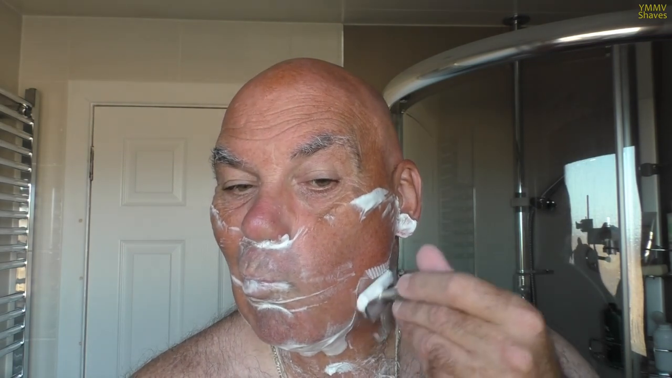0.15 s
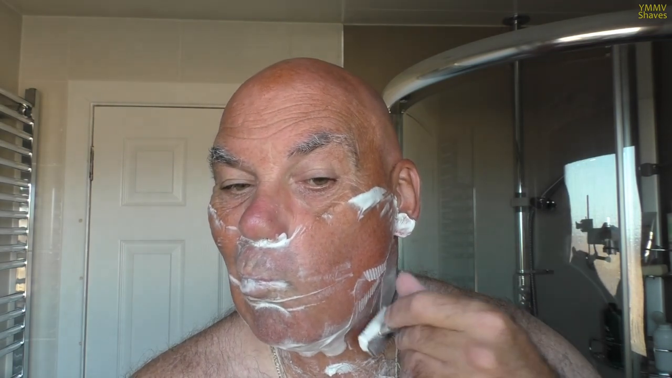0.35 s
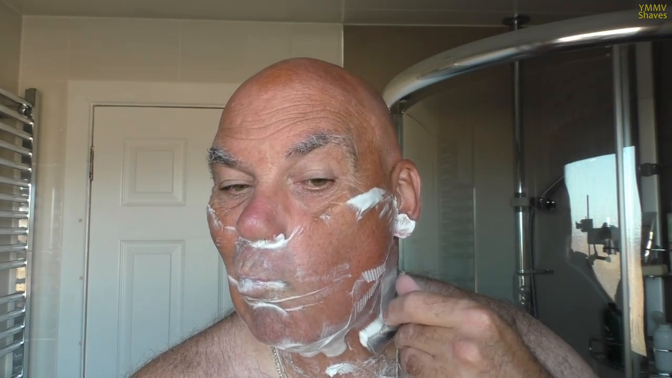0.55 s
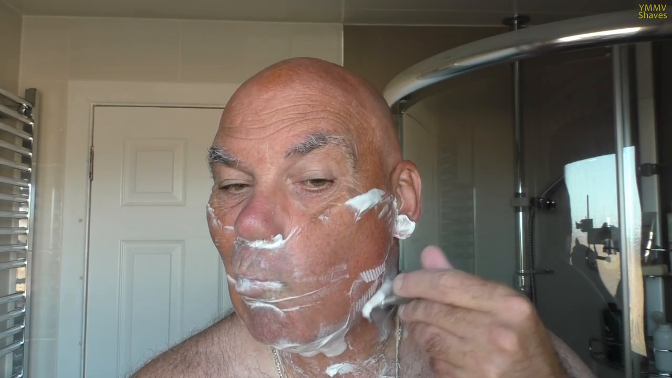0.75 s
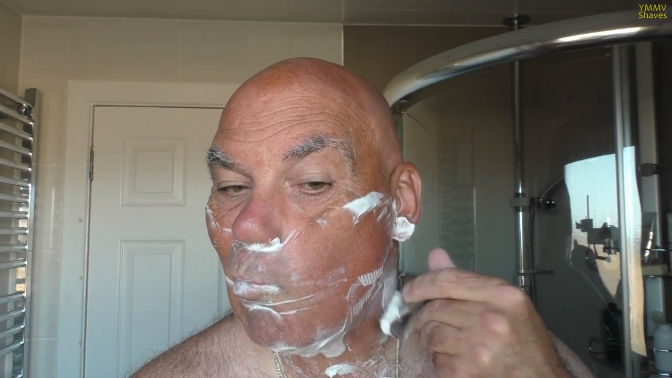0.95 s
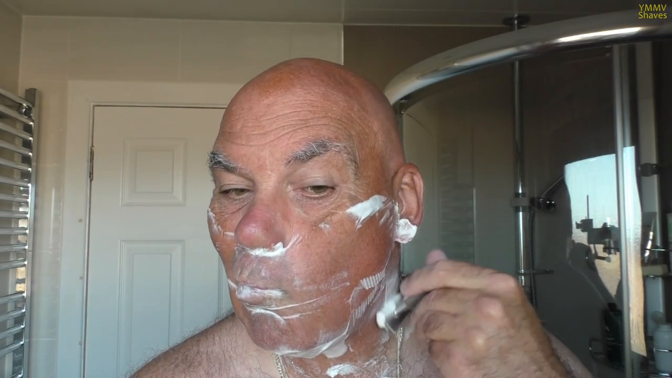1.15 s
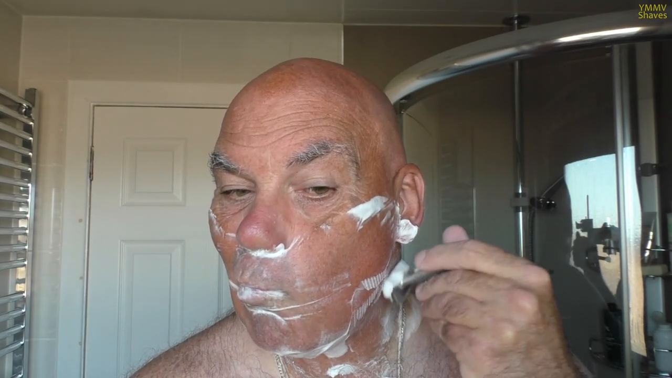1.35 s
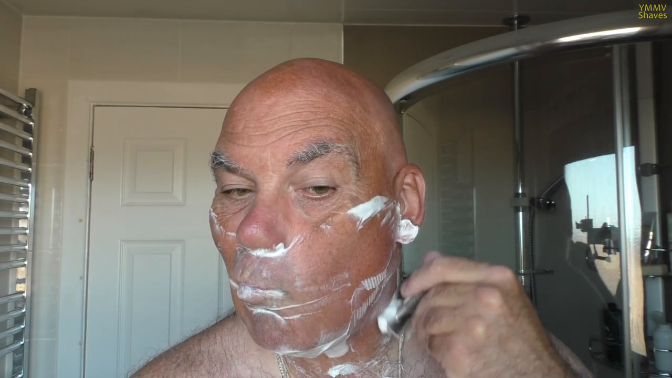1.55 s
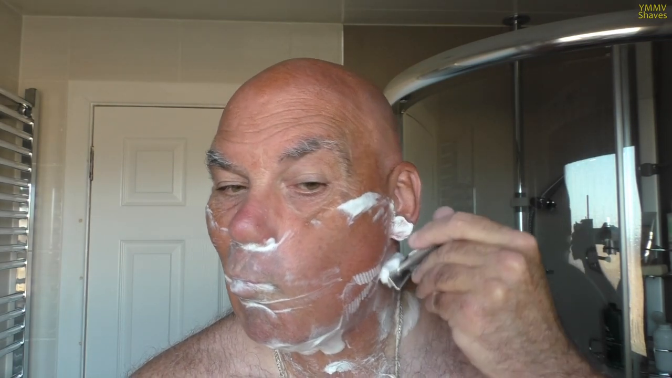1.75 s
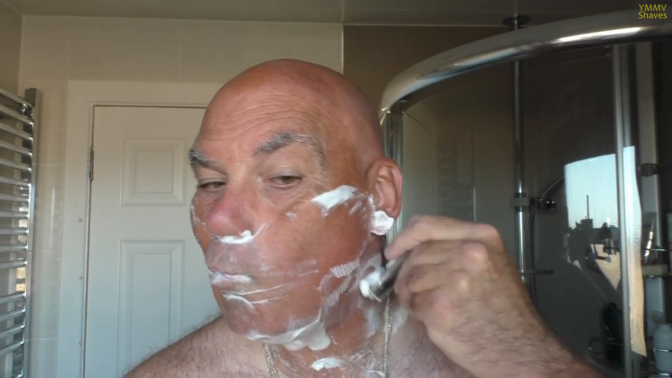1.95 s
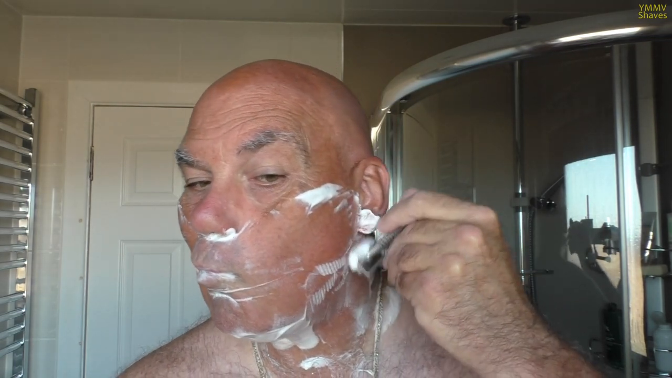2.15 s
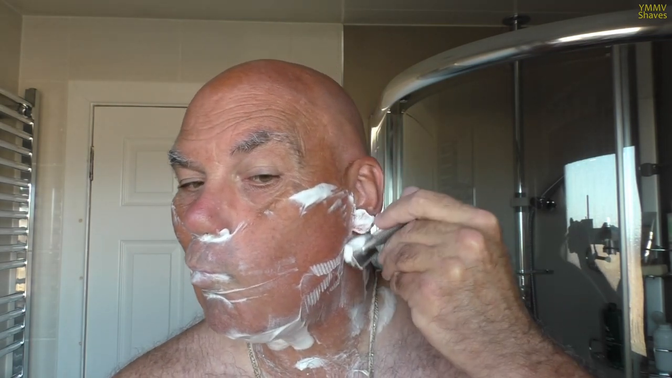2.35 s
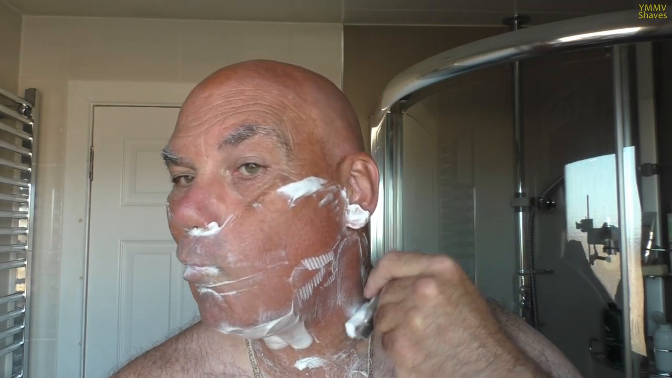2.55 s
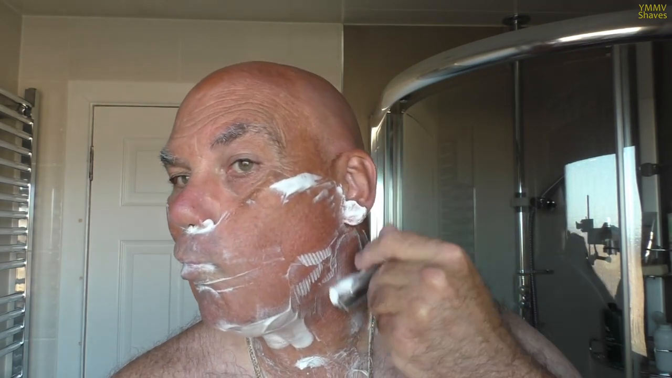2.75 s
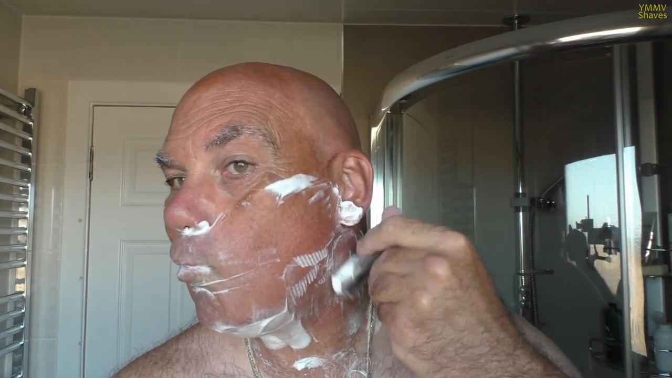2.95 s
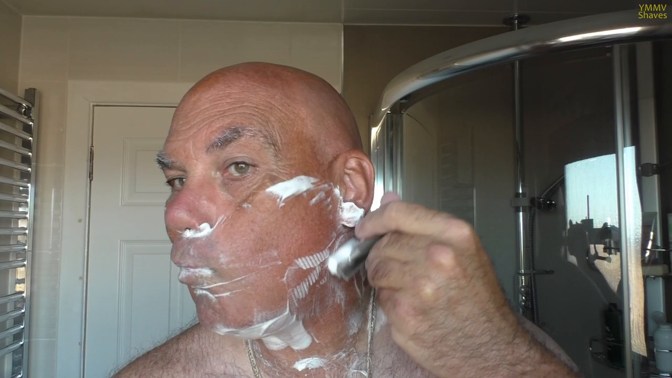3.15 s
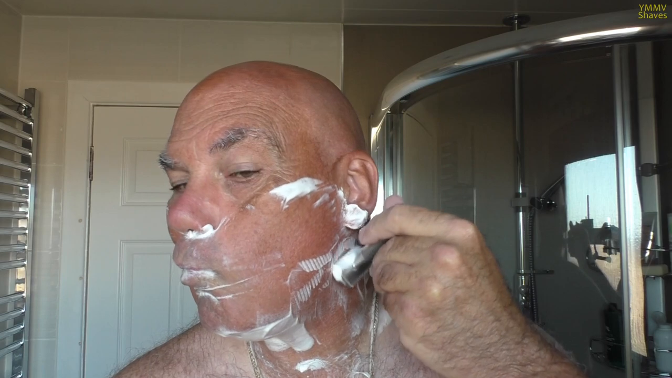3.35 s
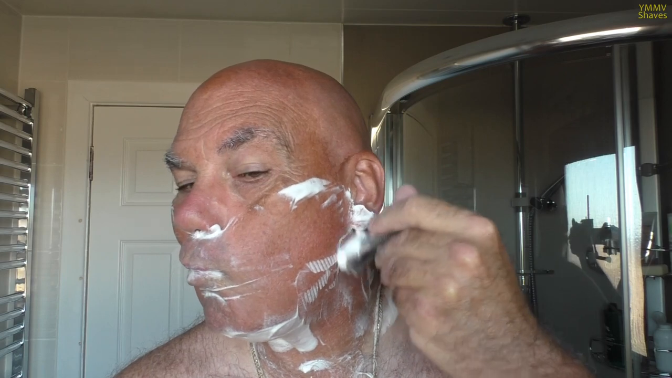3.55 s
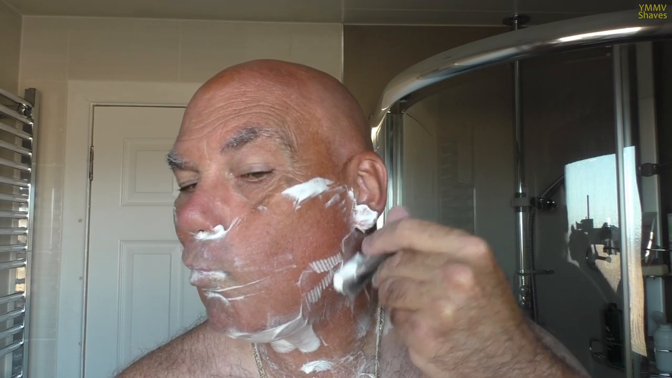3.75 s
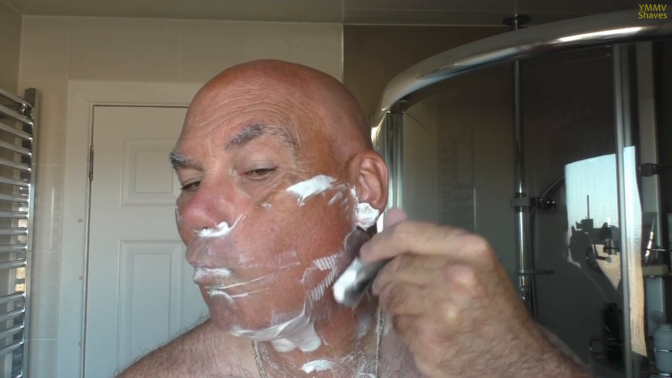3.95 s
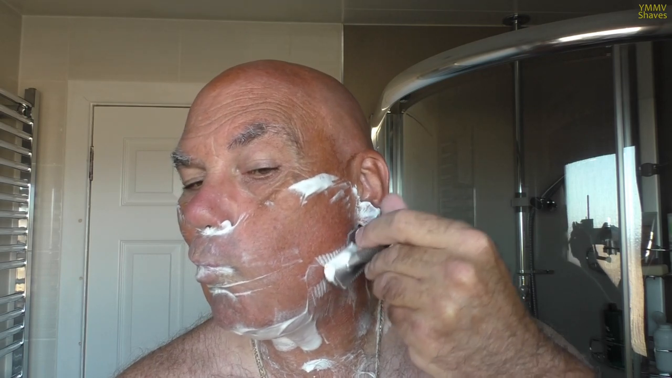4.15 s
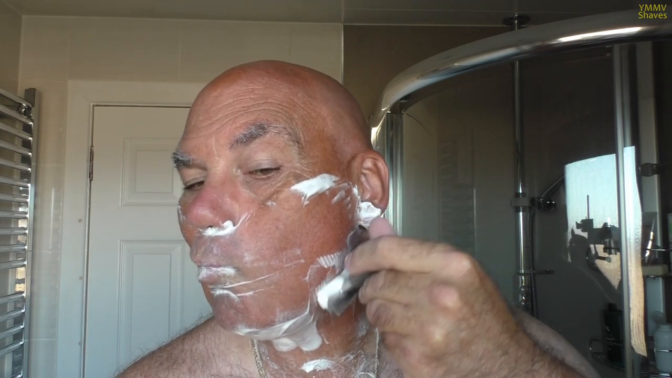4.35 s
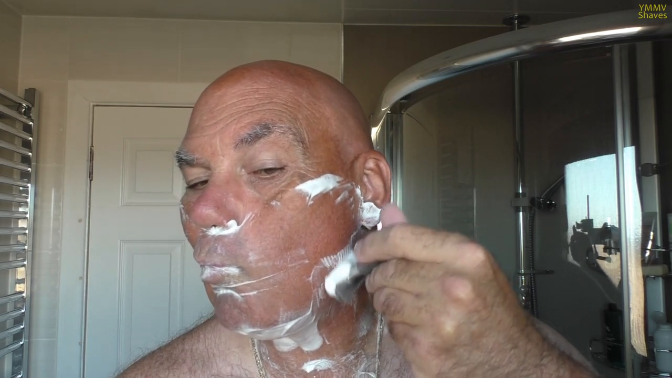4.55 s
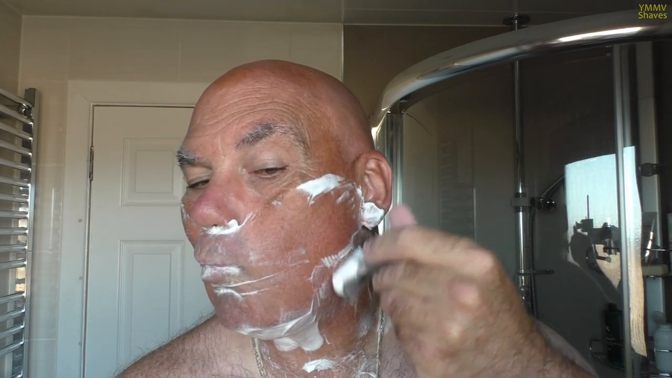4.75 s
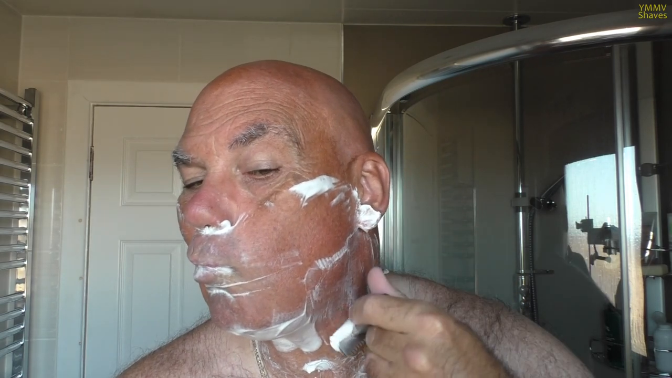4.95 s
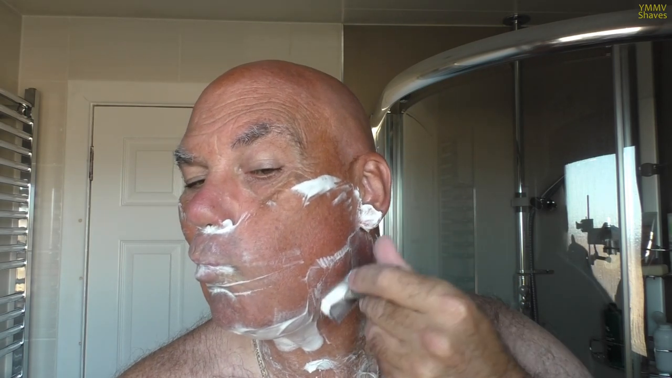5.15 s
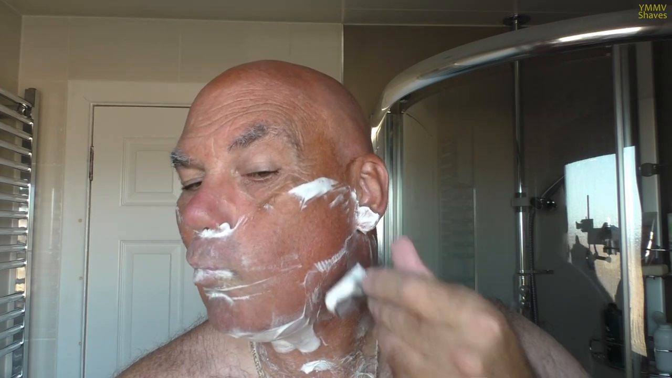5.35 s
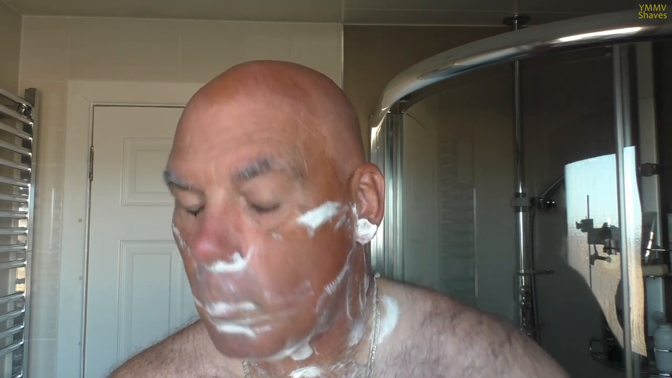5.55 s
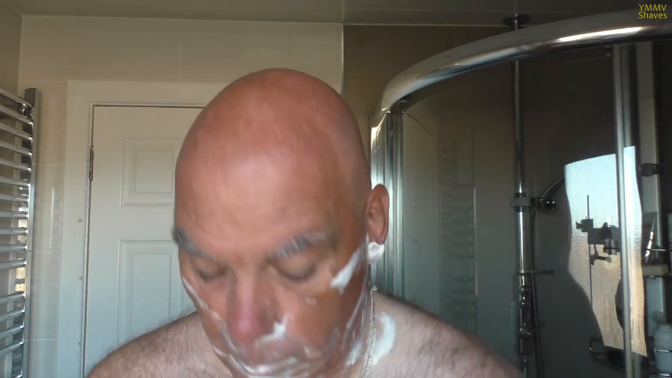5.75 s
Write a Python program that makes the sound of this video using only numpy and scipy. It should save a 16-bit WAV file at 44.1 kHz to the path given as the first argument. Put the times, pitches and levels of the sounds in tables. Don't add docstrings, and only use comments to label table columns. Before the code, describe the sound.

In a quiet tiled bathroom, a small nearby microphone picks up a razor making short, irregular, crackly scrapes through lather and stubble, with small ticks as the blade lands. A soft low fan rumble runs steadily beneath. After about five seconds of strokes there is a brief gap, then the razor scrapes and knocks on the ceramic basin, with a hollow low boom.

```python
import sys
import numpy as np
from scipy import signal
from scipy.fft import rfft, irfft
from scipy.io import wavfile
from scipy.ndimage import uniform_filter1d

SR = 44100
rng = np.random.default_rng(int(sys.argv[2]) if len(sys.argv) > 2 else 0)


def natural_amplitude(level_db):
    exponent = np.asarray(level_db, float) / 20
    return 10 ** exponent


def dump_mix(stems):
    frames = np.atleast_2d(stems).T
    limited = np.clip(frames, -1, 1)
    pcm = np.round(limited * 32767).astype(np.int16)
    wavfile.write(sys.argv[1], SR, pcm)


N = 256220


def evened(x):
    return x / np.sqrt(np.mean(x ** 2) + 1e-20)


def read(points, hz):
    f, value = np.transpose(points)
    return np.interp(np.log(hz + 1), np.log(f + 1), value)


def add(mix, s, sound):
    part = mix[round(s * SR):][:len(sound)]
    part += sound[:len(part)]


def colour(x, spectrum):
    gain = natural_amplitude(read(spectrum, np.fft.rfftfreq(len(x), 1 / SR)))
    return evened(irfft(rfft(x) * gain, len(x)))


def resonate(x, hz, width):
    turn = np.exp(2j * np.pi * np.cumsum(hz * np.ones(len(x))) / SR)
    r = np.exp(-np.pi * width / SR)
    smooth = signal.lfilter([1 - r], [1, -r], x / turn + 1e-18)
    return 2 * (turn * smooth).real


def ring(x, modes, skirt=3.9):
    out = 0
    for k, (hz, width, db) in enumerate(modes):
        mode = resonate(resonate(x, hz, width), hz, skirt * width + 60)
        out = out + (-1) ** k * natural_amplitude(db) * mode
    return out


def clicks(count, per_s, spread_db):
    chance, sign = rng.random((2, count))
    size = natural_amplitude(spread_db * np.minimum(rng.exponential(1, count), 5))
    return evened(size * np.sign(sign - .5) * (chance < per_s / SR))


def patchy(shape, bins, frames):
    over_hz = uniform_filter1d(rng.standard_normal(shape), bins, 0)
    return evened(uniform_filter1d(over_hz, frames, 1))


def air(spectrum, size, patch_db, flicker_db):
    noise = rng.standard_normal(N + size)
    hz, t, z = signal.stft(noise, SR, nperseg=size, noverlap=size * 3 // 4)
    field = patch_db * patchy(z.shape, 6, 8) + flicker_db * patchy((1, len(t)), 1, 3)
    level_db = np.where(hz < spectrum[0][0], -99, read(spectrum, hz))
    shaped = z * natural_amplitude(level_db[:, None] + field)
    return evened(signal.istft(shaped, SR, nperseg=size, noverlap=size * 3 // 4)[1][:N])


# [Hz, dB per Hz]
RUMBLE = [(12, -55), (20, -24.5), (188, 0.5), (233, 1.5), (298, -1), (397, -5), (465, -12), (577, -31.5),
          (620, -106), (810, -60), (1360, -120)]
# [Hz, dB per Hz]
HISS = [(340, -26), (580, -5.5), (1010, -3.5), (1090, -6.5), (1190, -4), (1820, -5), (2180, -7), (2440, -2),
        (2650, -16.5), (3040, -8), (3950, -12), (7150, -12), (9550, -6.5), (15700, -13.5)]
# [Hz, Hz, dB]
WHINE = [(2700, 83, -87.5)]
RUMBLE_DB, HISS_DB = -52, -66


def background():
    rumble = natural_amplitude(RUMBLE_DB) * air(RUMBLE, size=2048, patch_db=0.0, flicker_db=1.37)
    whine = 24.0 * ring(rng.standard_normal(N), WHINE)
    hiss = natural_amplitude(HISS_DB) * air(HISS, size=512, patch_db=2.5, flicker_db=0.65)
    return rumble + whine + hiss


# [s, s, s, dB, dB]
STROKES = [(.05, .035, 0.071, -47.5, -16), (.262, .012, .02, -68, -14), (.555, 0.086, 0.25, -53, -19),
           (.893, .01, .03, -66, -18), (1.14, 0.13, .145, -53.5, -11), (1.576, .08, .15, -53, -6),
           (1.834, .008, 0.013, -65.5, -14), (1.975, 0.033, 0.12, -49, -21.5),
           (2.265, 0.05, 0.07, -53, -11), (2.62, 0.022, 0.094, -65.5, -4.5), (2.7, 0.075, .14, -56, -8.5),
           (2.9, .02, 0.064, -70.5, -11), (3.069, 0.061, 0.12, -52, -11),
           (3.386, 0.063, 0.071, -48.5, -13.5), (3.716, 0.036, 0.1, -50, -17.5),
           (4.04, 0.024, 0.14, -57.5, -6.5), (4.23, 0.018, .04, -66, -9), (4.345, 0.016, 0.048, -59, -11),
           (4.389, 0.058, 0.081, -53, -8), (4.61, .065, 0.087, -61, -9.5), (4.938, 0.0045, .02, -71, -16),
           (4.997, .01, .03, -61.5, -18), (5.04, 0.057, 0.076, -48.5, -15),
           (5.09, 0.034, .125, -51.5, -9.5)]
GUARD_DB = (-6.5, -5.5, -8, -5.5, -8.5)
CHEEK_DB = (1, 1.5, -1.5, 0.5, 6)
# head resonance f/Hz, sagging under pressure [Hz]
HEAD_HZ = (4500, 4300, 4000, 4080, 4760)
LAND_S, LAND_DB, BITE_DB = 0.012, -17, -2.5
SLIP_S, SLIP_DB, FADE_DB_PER_S = 0.041, -11.5, 130
GUARD_FOLLOW = 0.45


def strokes(t):
    rows = []
    for land, bite, lift, db, cheek_db in STROKES:
        u = t - land
        at = np.cumsum([0, abs(bite), abs(lift - bite), SLIP_S, .15])
        level_db = np.interp(u, at[:4], [LAND_DB, BITE_DB, 0, SLIP_DB]) + db
        level_db = level_db - FADE_DB_PER_S * np.maximum(u - at[3], 0)
        level_db = level_db - 25 * np.maximum(-u, 0) / LAND_S
        guard_db = GUARD_FOLLOW * (cheek_db + 12) + np.interp(u, at, GUARD_DB)
        drum_db = cheek_db + np.interp(u, at, CHEEK_DB)
        rows.append([level_db, guard_db, drum_db, np.interp(u, at, HEAD_HZ)])
    rows = np.array(rows)
    loudest = rows[:, :1].argmax(axis=0)[None]
    return np.take_along_axis(rows, loudest, axis=0)[0]


# [s, dB, s, s]
FIZZES = [(.09, -49, -0.5, 0.06), (.285, -65.5, .02, 0.2), (.70, -52, .07, 0.07), (1.245, -56.5, .075, 0.1),
          (1.375, -67, 0.15, -0.1), (1.66, -55, 0.07, .08), (1.86, -58.5, .02, 0.08),
          (1.995, -55.5, .04, 0.1), (2.085, -50.5, 0.02, 0.05), (2.19, -65, 0, .04),
          (2.325, -57.5, .04, 0.08), (2.785, -51, 0.07, 0.08), (3.09, -55, 0, .05), (3.19, -59.5, .06, .04),
          (3.46, -54.5, 0.07, .055), (3.74, -50, .035, .075), (3.82, -54.5, 0, .03), (4.1, -55, 0.05, .05),
          (4.265, -66.5, .04, 0.1), (4.36, -60, 0.03, .04), (4.46, -59, 0.06, .06), (4.685, -62, 0.03, 0),
          (5.005, -59, .01, .06), (5.105, -48, .055, 0.12), (5.245, -56.5, .05, .06)]
ROUND = 1.45


def fizzes(t):
    s, db, rise, fall = np.transpose(FIZZES)[:, :, None]
    distance = np.where(t < s, (s - t) / abs(rise), (t - s) / abs(fall))
    power = natural_amplitude(db - 10 * distance ** ROUND) ** 2
    return 10 * np.log10(power.sum(axis=0) + 1e-12)


# [Hz, dB per Hz]
SNAP = [(410, -51), (700, -29), (982, -15.5), (1530, -7), (1830, -10), (2350, -2.5), (3050, -2.5),
        (3800, -0.5), (5400, -2.5), (10100, -5), (14900, -16.5), (15700, -30)]
# [Hz, Hz, dB]
HEAD = [(2368, 42, -6.5), (3980, 23, -37), (4850, 530, -15.5)]
EDGE_DB = -7.5


def stubble():
    s = np.arange(N // 64 + 9) * 64 / SR
    level_db, guard_db, cheek_db, head_hz = strokes(s)
    fizz_db = np.clip(fizzes(s) - level_db, EDGE_DB, 13)
    snaps = clicks(N, per_s=4500, spread_db=1.0)
    sagging = resonate(snaps, np.interp(np.arange(N) / SR, s, head_hz), 290)
    head = ring(snaps, HEAD) + natural_amplitude(-13.5) * sagging
    hz, t, z = signal.stft(snaps + 1.36 * head, SR, nperseg=256, noverlap=192)
    edge = np.clip(read([(5500, 0.05), (7500, 1)], hz), 0, 1)[:, None]
    guard = np.clip(read([(2050, 0.031), (2400, 0.9), (3100, 0.75), (3600, 0.019)], hz), 0, 1)[:, None]
    cheek = np.clip(read([(2050, 0.9), (2400, 0.051)], hz), 0, 1)[:, None]
    tilt_db = edge * (np.interp(t, s, fizz_db) + 0.5)
    tilt_db = tilt_db + guard * (np.interp(t, s, guard_db) + 5.5)
    tilt_db = tilt_db + cheek * (np.interp(t, s, cheek_db) + 11.5)
    field = read(SNAP, hz)[:, None] + tilt_db + 2.24 * patchy(z.shape, 3, 14)
    level = natural_amplitude(np.interp(t, s, level_db) + 10.5)
    return signal.istft(z * natural_amplitude(field) * level, SR, nperseg=256, noverlap=192)[1][:N]


# [s, dB, Hz, dB]
TICKS = [(0.0504, -44.5, 9700, -5), (0.269, -56, 4270, -9), (0.557, -46, 10200, -21),
         (0.5606, -36.5, 9900, -16), (.728, -37, 4300, -12), (0.8954, -49.5, 9150, -4.5),
         (1.199, -50, 10100, -16), (1.8363, -50, 4760, -11), (1.8404, -41, 7630, -14),
         (1.8594, -49.5, 9140, -8), (1.9904, -47, 5240, -11), (2.102, -38.5, 6100, -15),
         (2.299, -44.5, 6370, -16), (3.0784, -40, 9500, -9), (3.0834, -38, 10600, -10.5),
         (3.2948, -51.5, 3850, -6), (3.404, -56, 3420, -6), (3.441, -45, 4940, -9),
         (3.7232, -41, 10700, -15), (4.351, -47.5, 5000, -12), (4.4083, -45.5, 3770, -3.5),
         (4.6748, -45, 10500, -11.5), (4.945, -50, 10300, -9), (4.998, -52, 8000, -10),
         (5.021, -49, 4770, -9), (5.0424, -46, 5100, -14), (5.2295, -40, 3700, -8),
         (5.566, -54, 9200, -2.5)]
FIZZ_T60 = 0.13


def ticks():
    out, t = np.zeros(N), np.arange(4000) / SR
    for s, db, hz, fizz_db in TICKS:
        click = np.sin(2 * np.pi * hz * t) * np.exp(-t / .00028) * np.minimum(t / .0001, 1)
        bubbles = clicks(len(t), per_s=7200, spread_db=4.0)
        fizz = evened(resonate(bubbles, hz, 3500)) * natural_amplitude(-60 * t / FIZZ_T60)
        add(out, s, natural_amplitude(db) * (natural_amplitude(7.5) * click + natural_amplitude(fizz_db) * fizz))
    return signal.sosfilt(signal.butter(4, 2500, "high", fs=SR, output="sos"), out)


# [s, dB, dB]
RUB = [
    (5.4, -83, 0),
    (5.434, -55.5, -15),
    (5.468, -57.5, -10),
    (5.552, -44, -4),
    (5.576, -54, 2.5),
    (5.588, -43.5, -1),
    (5.632, -44.5, 0.5),
    (5.697, -49, -2.5),
    (5.81, -42.5, -10.5),
]
# [Hz, Hz, dB]
LOWER = [(836, 110, -17), (1018, 65, -8.5), (1132, 41, -5), (1335, 74, -4), (1477, 26, -7.5),
         (1532, 35, -7.5)]
# [Hz, Hz, dB]
MIDDLE = [(1850, 90, -21), (2250, 50, -11), (2330, 34, 0), (2520, 130, -17), (2783, 35, -8)]
# [Hz, Hz, dB]
UPPER = [(4550, 60, -23), (4830, 130, -28.5), (5740, 86, -29), (6730, 150, -34.5)]
# [Hz, dB per Hz]
SCRATCH = [(280, -44.5), (480, -10), (779, -16), (967, -28.5), (1140, -1), (1320, -6), (1680, -14),
           (2380, -0.5), (2730, -5), (3160, -11.5), (4610, -10.5), (5570, -22), (12000, -23.5),
           (15600, -57), (22000, -120)]
UPPER_DB, UPPER_FOLLOW, SCRATCH_DB = -60.5, 0.42, -4


def rub():
    s, rub_db, lower_db = np.transpose(RUB)
    upper_db = UPPER_DB - rub_db + UPPER_FOLLOW * (rub_db + 48.5) + 0.35 * lower_db
    t = np.arange(N - round(s[0] * SR)) / SR + s[0]
    grit = clicks(len(t), per_s=2500, spread_db=3.0)
    scratch = colour(clicks(len(t), per_s=12000, spread_db=1.0), SCRATCH)
    slide = evened(ring(grit, MIDDLE)) + natural_amplitude(SCRATCH_DB) * scratch
    slide = slide + natural_amplitude(np.interp(t, s, lower_db)) * evened(ring(grit, LOWER))
    slide = slide + natural_amplitude(np.interp(t, s, upper_db)) * evened(ring(grit, UPPER))
    out = np.zeros(N)
    add(out, s[0], natural_amplitude(np.interp(t, s, rub_db) - 4) * slide)
    return out


# [s, dB]
THUDS = [
    (5.422, -42),
    (5.5774, -26.5),
    (5.61, -36.5),
    (5.651, -37),
    (5.7, -37.5),
    (5.759, -41.5),
]
# [Hz, Hz, dB]
BOWL = [(188, 9, 0), (240, 90, -9), (294, 24, 4), (357, 5, 8), (470, 60, -22)]


def boom():
    thuds = np.zeros(N)
    for s, db in THUDS:
        add(thuds, s, natural_amplitude(db + 15.5) * np.hanning(110))
    return ring(thuds, BOWL, skirt=2.5)


# [s, dB]
KNOCKS = [(5.424, -44), (5.481, -60), (5.5, -42.5), (5.546, -47), (5.58, -34), (5.5872, -26), (5.613, -29),
          (5.617, -40), (5.622, -26), (5.655, -39), (5.716, -37), (5.746, -56)]


def knocks():
    blows = np.zeros(N)
    for s, db in KNOCKS:
        add(blows, s, natural_amplitude(db + 24.5) * np.hanning(9))
    return ring(blows, LOWER + MIDDLE + UPPER)


# [Hz, s]
TILES = [(300, 0.29), (1500, 0.48), (4000, 0.22), (10000, 0.41)]


def tiles(x):
    taps = np.zeros(SR // 2)
    at = np.arange(200, SR // 2 - 20, 20)
    taps[at + rng.integers(0, 20, len(at))] = rng.choice([-1., 1.], len(at))
    hz, t, z = signal.stft(taps, SR, nperseg=256)
    decay = natural_amplitude(-60 * t / read(TILES, hz)[:, None])
    tail = signal.istft(z * decay, SR, nperseg=256)[1]
    return signal.fftconvolve(x, tail / np.linalg.norm(tail))[:N]


def scene():
    razor = stubble() + ticks()
    wall = rub() + knocks()
    echo = tiles(natural_amplitude(-8) * razor + natural_amplitude(-12.0) * wall)
    return (razor + wall + boom() + echo + background())[None]


def top_cut(x):
    return signal.sosfilt(signal.butter(12, 16460, fs=SR, output="sos"), x)


def record(dry):
    low_pass = signal.firwin(1023, 15850, window=("kaiser", 9), fs=SR)
    limited = signal.oaconvolve(dry, low_pass[None], "same")
    return top_cut(limited)


dry = scene()
out = record(dry)
dump_mix(out)
```